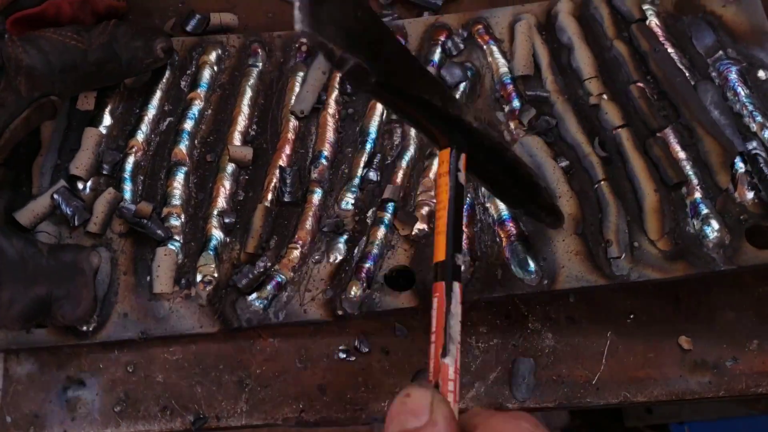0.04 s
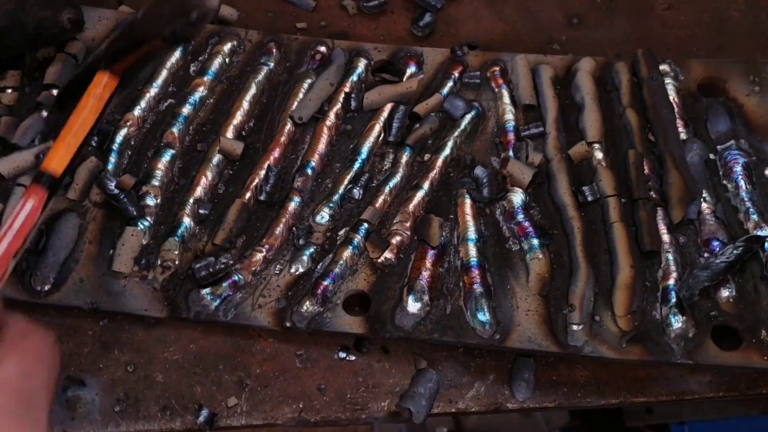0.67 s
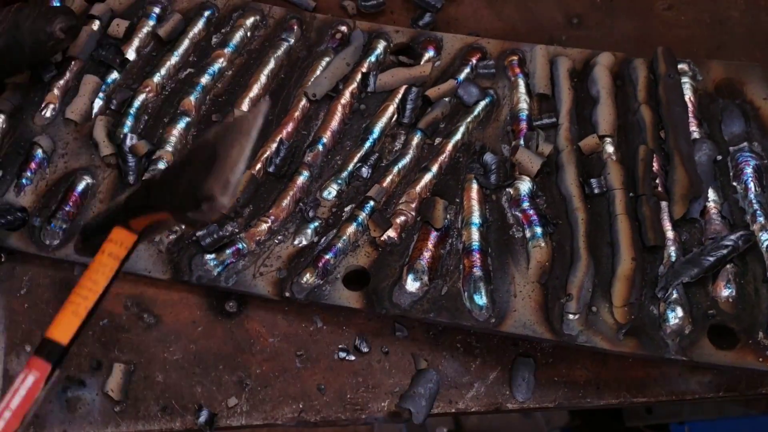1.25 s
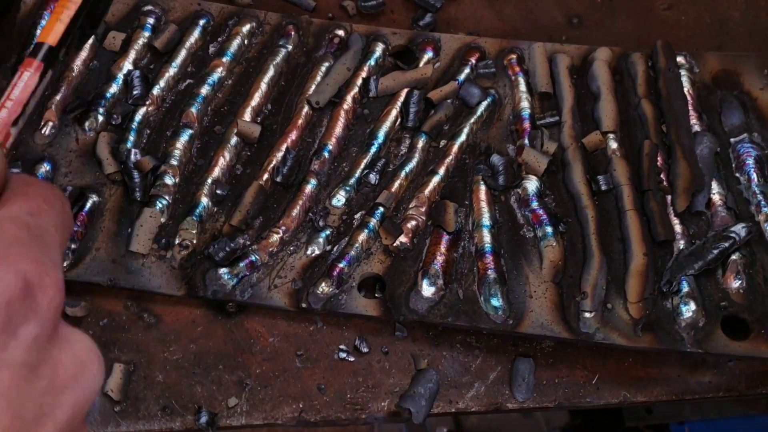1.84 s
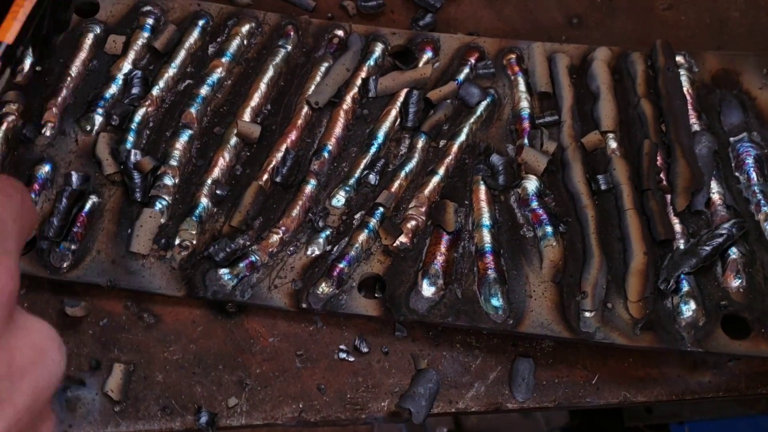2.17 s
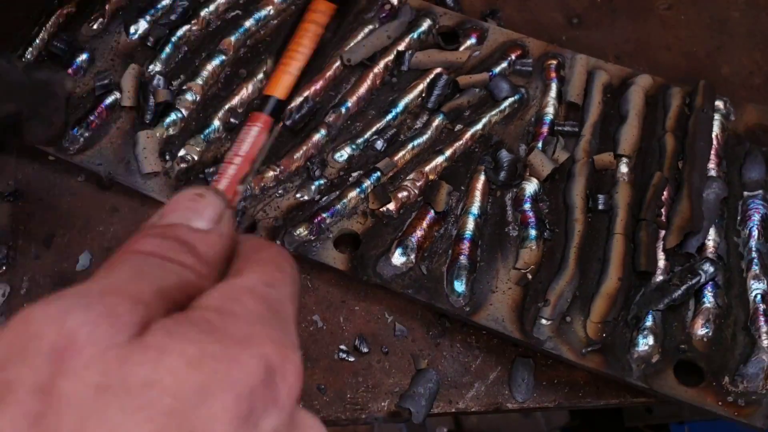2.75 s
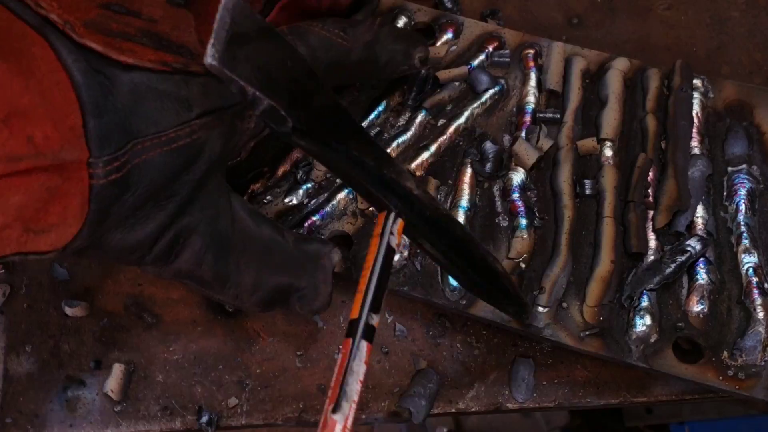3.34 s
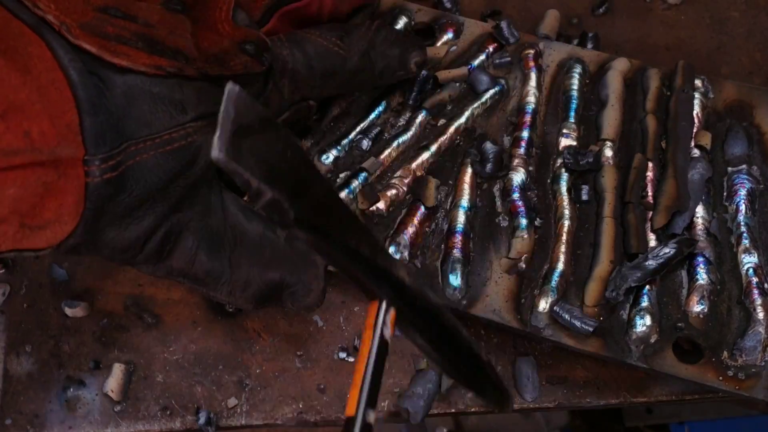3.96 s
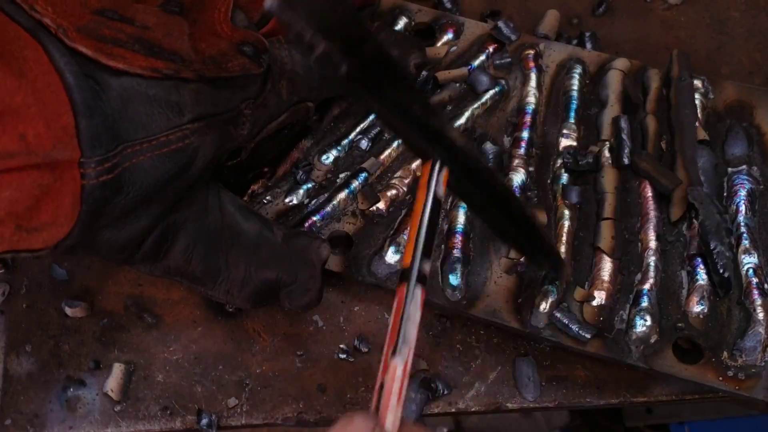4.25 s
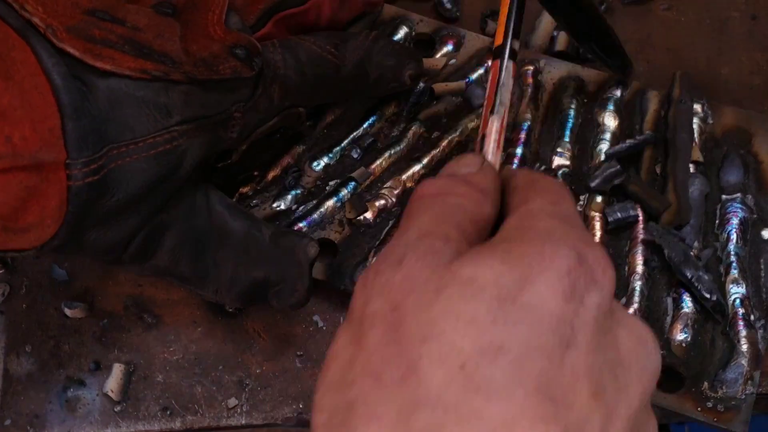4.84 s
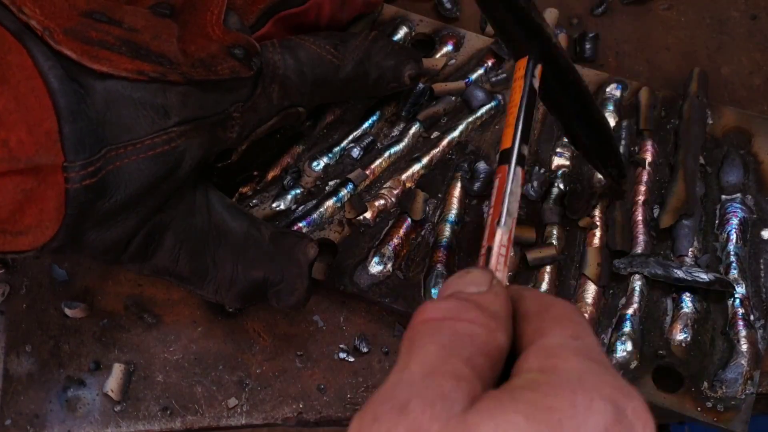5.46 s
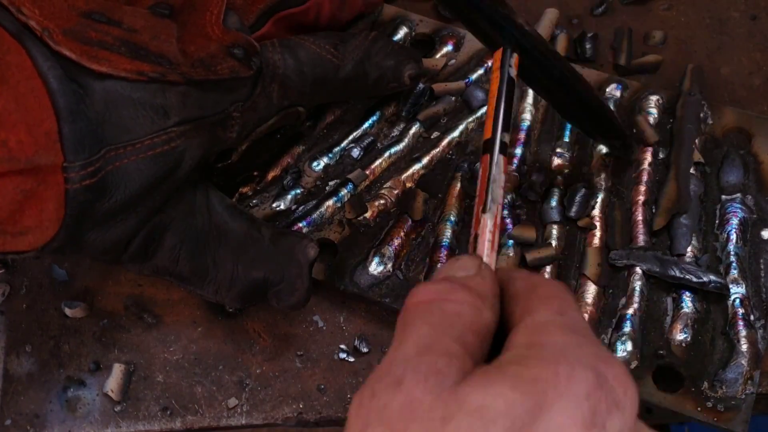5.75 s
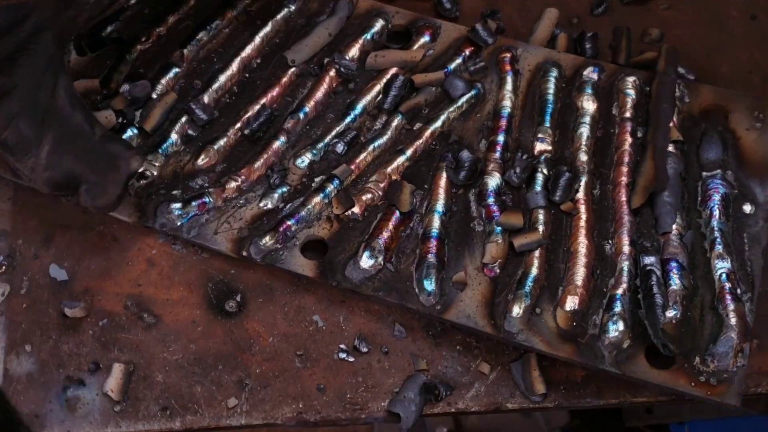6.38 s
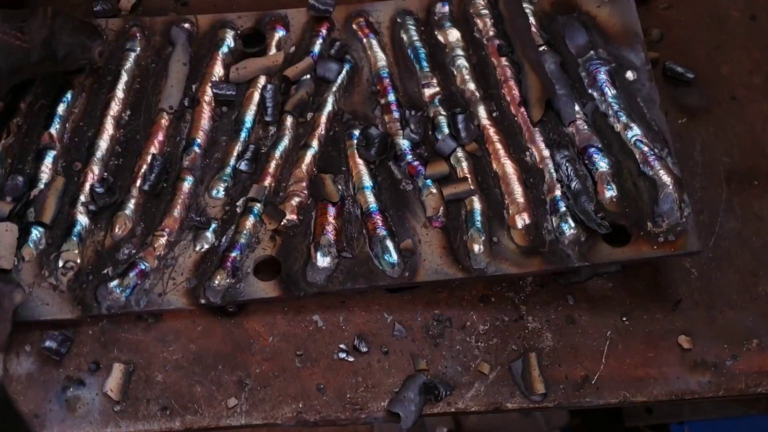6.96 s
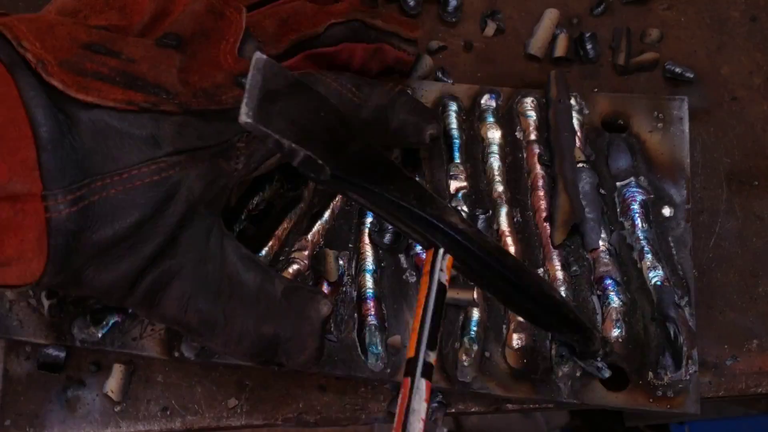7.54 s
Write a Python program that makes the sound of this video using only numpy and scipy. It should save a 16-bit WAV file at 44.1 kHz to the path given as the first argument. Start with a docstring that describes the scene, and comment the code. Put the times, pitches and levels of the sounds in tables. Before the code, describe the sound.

Close up in a quiet workshop, a steel tool taps and scratches at crusted welds on a loose metal plate. Each hit rings briefly and scatters small ticking chips. The plate is then held down for a run of quick, rasping strokes and bright clinks, before it shifts across the bench with a scrape and a few dull thumps. A last few knocks follow, with the bench rumbling softly underneath.

```python
"""In a workshop, close by, a steel hand tool knocks and scrubs slag (crust) off the welds of a steel plate.
In each stroke the edge sticks and slips, and this rush of tiny hits makes plate and tool ring.
Knocks chatter for a few milliseconds and throw flakes of slag, which tick as they land.
The plate lies loose at first, then a gloved hand holds it down for the fastest scrubbing,
then it slides and judders. The bench rumbles underneath."""
import sys
import numpy as np
from scipy import signal
from scipy.fft import rfft, irfft, next_fast_len
from scipy.io import wavfile
from scipy.ndimage import uniform_filter1d

SR = 44100
rng = np.random.default_rng(int(sys.argv[2]) if len(sys.argv) > 2 else 0)


def wav_record(signal):
    """Record a signal, one row per channel, as 16-bit PCM in the file named by sys.argv[1]."""
    frames = np.transpose(np.atleast_2d(signal))
    bounded = np.clip(frames, -1, 1)
    # unit amplitude maps onto the largest positive 16-bit level
    quanta = np.round(bounded * 32767).astype(np.int16)
    wavfile.write(sys.argv[1], SR, quanta)


N = 340011
TIME = np.arange(N) / SR
LOOSE, HELD, SLIDING = 0, 1, 2  # the three grips on the plate
HELD_FROM_S, HELD_TO_S, SLID_TO_S = 3.3, 6.2, 7.5
MEDIUM_SCRAPE_DB = -35.5

# The faint hiss of the still room: pitch_hz, level_db
AIR_COLOUR = [(20, 2.5), (120, -25), (300, -6.5), (1500, 17), (4000, 6), (15000, -17)]
# The low boom of the bench top: pitch_hz, level_db
BENCH_COLOUR = [(20, -39.5), (45, -19.5), (70, -14), (92, -6.5), (112, -0.5), (135, 2), (160, -8.5),
                (200, -15), (280, -18), (600, -70)]
# The plate rocks and thumps the bench: peak_s, level_db
BENCH_THUMPS = [(0.35, -32.5), (0.55, -33.5), (0.61, -34.5), (0.67, -32), (0.968, -29.5), (1.102, -35),
                (2.09, -39), (3.86, -35), (4.016, -34.5), (4.68, -36), (5.71, -35), (5.99, -40),
                (6.29, -39.5), (6.48, -51), (6.72, -37.5), (6.85, -26.5), (6.928, -20.5), (6.98, -28.5),
                (7.139, -40.5), (7.285, -41), (7.46, -27.5), (7.57, -41)]
# What each grip does, one row each for loose, held and sliding ("body" means the low tones):
# scrape_body_db, knock_body_db, rumble_at_medium_scrape_db, rumble_db_per_scrape_db, boom_pitch_ratio
GRIP_EFFECTS = [(6, 6, -42, 0.55, 1.05), (1.5, -0.5, -47.5, 0.44, 0.95), (5.5, 5, -41, 0.72, 1.007)]
# The broad tone of steel touching steel: pitch_hz, loose_db, held_db, sliding_db
CONTACT_COLOUR = [(40, -5, -11, -44), (130, 1, -5, 1.5), (261, -5.5, -3.5, -2), (424, 1.5, -1, -4.5),
                  (810, 0.7, 0.5, -7), (940, -0.5, -3, -6), (2360, -2.5, -6, -9), (3720, 2, -2.5, -2),
                  (4850, -8, -20.5, -14), (5980, -15, -27, -20.5), (9800, -24.5, -35, -26),
                  (13500, -28.5, -45.5, -33.5), (14900, -32, -49, -39)]
# Modes (pitches a thing likes to ring at) of plate and tool:
# pitch_hz, width_hz, loose_lift_db, held_lift_db, sliding_lift_db
STEEL_MODES = [(530, 430, 2.5, 0.13, 7), (691, 140, -2, 3.6, -5.5), (820, 70, 2, 5.1, 1.5),
               (1543, 370, 12.5, 10.1, 8), (1726, 400, 5, 4.4, 9.5), (2102, 186, 13, 4, 8),
               (2520, 344, 11, 0.55, 7.5), (2792, 380, 4.5, 2.3, 4.5), (3360, 510, 9, 3.1, 6),
               (5100, 280, 5, 10.4, 3.5), (5850, 440, 5, 1.6, 5.5), (7100, 390, 1, 6.4, 0),
               (7370, 60, -5, 3.8, 4), (8700, 620, 0.5, 2.2, -0.5), (9800, 870, 8, 6.9, 3),
               (10800, 170.0, 9, 2.9, 6), (12300, 380, -6, 10, -1)]
# The plate's high modes: pitch_hz, level_db
PLATE_MODES = [(3930, -67), (4075, -86), (4264, -66), (5087, -69), (5690, -68), (6368, -83), (6659, -70),
               (7499, -72), (7763, -79), (8457, -74), (9502, -75.5), (11278, -79.5), (11606, -76.5),
               (13577, -82)]
# Modes of the tool's head (t60 is the time to fade by 60 dB): pitch_hz, not_held_db, held_db, t60_s
TOOL_MODES = [(1520, -33, -39, 0.15), (2126, -60, -45, 0.045), (3050, -48, -32, 0.24),
              (5096, -45, -26.5, 0.057), (7240, -41, -20, 0.025)]
# The surfaces stay in light touch between strokes: start_s, end_s, level_db, bright_db
LIGHT_RUBS = [(0, 0.1, -38.5, 0), (0.136, 0.471, -47.5, 7.5), (0.552, 0.995, -45, 0), (1.436, 1.52, -51, 4),
              (2.499, 2.722, -44, 3), (2.923, 3.146, -50.5, 8.5), (3.433, 4.016, -39.5, 3),
              (4.17, 4.887, -47.5, 3), (5.047, 5.384, -53, 5), (5.501, 6.206, -48, 10),
              (6.272, 6.52, -51, 0), (6.55, 7.073, -53, 5.5), (7.12, 7.168, -57.5, -15),
              (7.572, 7.69, -46.5, 12)]
# Scraping strokes, about thirteen a second at the fastest: peak_s, length_s, level_db, bright_db
SCRAPE_STROKES = [(0.059, 0.02, -27.5, -6), (0.152, 0.012, -33, 1), (0.22, 0.03, -44.5, 7),
                  (0.283, 0.02, -40.5, 6), (0.602, 0.059, -41, -9), (0.731, 0.035, -33, 3),
                  (0.815, 0.02, -31, 2.5), (0.883, 0.027, -29.5, 3.5), (0.971, 0.058, -36.5, 4.5),
                  (1.152, 0.046, -36.5, 2), (1.4, 0.035, -32.5, -5), (1.633, 0.045, -41, 0.5),
                  (1.956, 0.022, -42, -2), (2.12, 0.027, -37, 0), (2.398, 0.014, -31, -4),
                  (2.61, 0.011, -45, 3), (2.665, 0.032, -36, 6.5), (3.24, .014, -51, 10),
                  (3.577, 0.02, -24.5, .5), (3.666, 0.037, -26, -2), (3.75, 0.039, -21, -2.5),
                  (3.859, 0.048, -24, -2), (3.955, 0.053, -21.5, -4), (4.205, 0.031, -35.5, 9.5),
                  (4.298, 0.022, -33, -4), (4.365, 0.032, -34.5, 2), (4.446, 0.013, -37.5, 3),
                  (4.507, 0.019, -32, 2), (4.592, 0.027, -31.5, 3), (4.675, 0.039, -28.5, 3),
                  (4.739, 0.028, -31, 2.5), (4.808, 0.031, -30.5, 1), (4.845, .017, -28, 1),
                  (4.876, 0.014, -31, 4), (5.243, 0.041, -38, 5.5), (5.316, 0.03, -30.5, 6),
                  (5.552, 0.036, -28.5, -1), (5.616, 0.041, -28.5, .5), (5.675, 0.029, -32, -12),
                  (5.759, 0.024, -29.5, -10), (5.83, 0.03, -28.5, -4), (5.888, 0.023, -23, -3),
                  (6.046, 0.053, -27, 1), (6.234, 0.024, -36.5, 14), (6.292, 0.031, -43.5, 2),
                  (6.459, 0.068, -31, 1), (6.588, .022, -34.5, 10.5), (6.754, 0.015, -38.5, 10),
                  (6.851, 0.047, -26, 2.5), (6.91, 0.084, -29.5, -4), (7.277, 0.052, -39.5, 5.5),
                  (7.421, 0.065, -35, 4), (7.451, 0.033, -21, -3), (7.629, 0.026, -30, 1),
                  (7.715, 0.014, -36, 6)]
# The tool lands or catches on a weld, then drags on:
# start_s, chatter_s, level_db, bright_db, clink_hz, clink_lift_db, drag_db
TOOL_KNOCKS = [(0.111, 0.011, -36, 11, 1250, 11, -43.5), (0.309, 0.027, -28, 6.5, 2760, 3, -32),
               (0.383, 0.0078, -27, 6.5, 2000, 5, -68), (0.461, .01, -62, 7, 2000, 8, -54.5),
               (0.533, 0.016, -29, -2, 1950, 3.5, -46), (0.647, .012, -30, 8.5, 2500, 2, -45),
               (0.751, .011, -25, -2, 1300, 0.5, -37), (0.907, .0085, -24, 12.5, 3570, 8, -40),
               (1.092, 0.013, -22.5, -2, 2220, 6.5, -45), (1.176, .014, -20, 6, 4170, 8.5, -42.5),
               (1.317, 0.0069, -25.5, -10, 1820, 7, -55), (1.407, 0.0065, -17, 6, 4280, 7.5, -49),
               (1.558, 0.017, -42.5, -2, 3720, -2, -41.5), (1.7, 0.013, -46, 3, 2620, -5, -58),
               (1.737, 0.0059, -27, 3, 5100, 13, -32), (1.893, 0.0048, -24, -4, 1700, 13.5, -36),
               (2.056, 0.0089, -29.5, -3, 3480, 6.5, -40), (2.216, 0.011, -20.5, -6, 1890, 8.5, -33.5),
               (2.329, 0.0064, -53, 4, 3000, -6, -60), (2.362, 0.019, -27, -2.5, 2310, 6, -38),
               (2.469, 0.0044, -34, 3, 2020, 5, -49), (2.524, 0.0045, -32.5, -2, 2620, 23, -52),
               (2.837, 0.0051, -22.5, -3, 1770, 9, -38), (2.879, 0.0074, -24, -11, 1850, 9, -75),
               (3.056, 0.021, -38, 6, 3300, 4, -66), (3.315, 0.01, -31.5, 3.5, 2330, 7, -46.5),
               (3.412, 0.018, -40, 10, 1590, 11, -46), (3.496, 0.019, -22.5, 6, 3000, 0, -52),
               (3.565, 0.0027, -29, -9, 3780, 14, -45), (3.993, 0.018, -19, 4.5, 3250, 7.5, -58),
               (4.147, 0.0045, -18, -6, 1600, 5.5, -48), (4.516, 0.019, -26.5, -1, 1420, 6, -60),
               (4.887, 0.0076, -24.5, 4.5, 2000, 4, -61), (4.948, 0.0094, -20.5, -2.5, 5100, 9, -49),
               (4.989, .004, -37, 4, 1350, 8, -44), (5.034, 0.0021, -25, -10, 1730, 29, -26),
               (5.072, 0.012, -24, 0, 1840, 5, -57), (5.126, 0.012, -25.5, 1, 3900, 5, -31),
               (5.145, 0.0021, -16.5, 0, 4300, 7, -53), (5.327, 0.0012, -11.5, 1.5, 2800, 2.5, -41),
               (5.365, 0.011, -50, 22, 3100, 4, -80), (5.462, 0.0061, -33, 6.5, 3670, 4, -59),
               (5.695, 0.019, -22, -1, 3450, -0.5, -42), (5.742, 0.009, -21, -12, 1580, 1, -50),
               (5.869, 0.007, -23, -17, 1875, -2, -51), (5.94, 0.02, -24.5, -3, 1400, 1.5, -33.5),
               (6.719, .0077, -37, 6, 1190, 11, -48), (6.913, 0.015, -23.5, 2, 3460, 4, -35.5),
               (6.949, 0.015, -25.5, 0, 1980, 3, -44), (7.003, 0.0048, -24.5, 3, 2870, 3.5, -68),
               (7.052, 0.0036, -49, -3, 1600, 14, -71), (7.093, 0.0053, -38, 5, 1650, 1, -49),
               (7.35, 0.0068, -33.5, 0, 2400, 3, -39.5), (7.554, 0.0079, -18, -9, 1910, 3.5, -48),
               (7.661, 0.0034, -24.5, 1, 2140, 9, -55)]


def undb(db):
    """Turn decibels into a gain."""
    return 10 ** (np.asarray(db) / 20)


def rms(x):
    """The average strength of a sound (root mean square)."""
    return np.sqrt(np.mean(x ** 2))


def fade(t, t60_s):
    """A ring dying away, 60 dB down after t60_s."""
    return np.exp(-np.log(1000) * t / t60_s)


def along(hz, points_hz, points_db):
    """Join the points of a tone curve with straight lines over log frequency."""
    return np.interp(np.log(hz + 1), np.log(points_hz), points_db)


def noise(colour):
    """Noise of rms 1, shaped by rows of pitch_hz, level_db."""
    size = next_fast_len(N, real=True)
    gain = undb(along(np.fft.rfftfreq(size, 1 / SR), *np.transpose(colour)))
    x = irfft(rfft(rng.standard_normal(size)) * gain, size)[:N]
    return x / rms(x)


def steadied(x, span_s):
    """Even out swells longer than span_s, keeping the fine texture."""
    window = max(int(span_s * SR), 2)
    power = uniform_filter1d(uniform_filter1d(x ** 2, window), window)
    return x / np.sqrt(np.abs(power) + 1e-18)


def add(track, start_s, sound, loudness):
    """Mix a sound into the track at the given rms."""
    start = int(start_s * SR)
    first, last = max(start, 0), min(start + len(sound), N)
    track[first:last] += sound[first - start:last - start] * loudness / rms(sound)


def grip_at(s):
    """Whether the plate is LOOSE, HELD or SLIDING at this time."""
    return HELD * ((s > HELD_FROM_S) & (s <= HELD_TO_S)) + SLIDING * ((s > HELD_TO_S) & (s < SLID_TO_S))


def air(level_db=-74):
    """The still workshop hisses faintly."""
    return undb(level_db) * noise(AIR_COLOUR)


def room_echoes(x, wet_db=-11, t60_s=0.15, gap_s=0.0027):
    """Add quick, dense echoes from the bench and the things around it."""
    t = np.arange(SR // 2) / SR
    tail = rng.standard_normal(len(t)) * fade(t, t60_s) * (t > gap_s)
    wet = signal.fftconvolve(x, tail / np.sqrt(np.sum(tail ** 2)))[:N]
    return (x + undb(wet_db) * wet) / np.sqrt(1 + undb(wet_db) ** 2)


def bench_rumble(push, settle_s=0.01, thump_rise_s=0.012, thump_fall_s=0.024):
    """The bench top booms, louder the harder the plate is worked, and whenever the plate rocks."""
    keep = np.exp(-1 / (settle_s * SR))
    load = signal.lfilter([1 - keep], [1, -keep], (push / undb(MEDIUM_SCRAPE_DB)) ** 2 + 1e-12)
    grip = grip_at(TIME)
    _, _, rumble_db, growth, _ = np.array(GRIP_EFFECTS)[grip].T
    power = undb(rumble_db) ** 2 * load ** growth
    for peak_s, level_db in BENCH_THUMPS:
        t = TIME - peak_s
        width_s = np.where(t < 0, thump_rise_s, thump_fall_s)
        power += undb(level_db) ** 2 * np.exp(-(t / width_s) ** 2)
    # the weight of the pressing hand lowers the boom's pitch
    booms = [noise([(hz * ratio, db) for hz, db in BENCH_COLOUR]) for *_, ratio in GRIP_EFFECTS]
    return steadied(np.choose(grip, booms), span_s=0.038) * np.sqrt(power)


def plate_shimmer(x, ring_db=-9, t60_s=0.064, glove_db=-10):
    """The plate's high modes ring on faintly after each touch, less so under the glove."""
    t = np.arange(SR // 3) / SR
    mode_hz, mode_db = np.transpose(PLATE_MODES)
    # the touch already carries the broad tone, so take that out of each mode's level
    gains = undb(mode_db - along(mode_hz, *np.transpose(CONTACT_COLOUR)[:2]))
    tail = gains @ np.cos(2 * np.pi * mode_hz[:, None] * t) * fade(t, t60_s)
    held = grip_at(TIME) == HELD
    drive = x * undb(ring_db + glove_db * held)
    return signal.fftconvolve(drive, tail / np.sqrt(np.sum(tail ** 2)))[:N]


def tool_ring(x):
    """Every touch shakes the tool's head, heard as a faint ring once it lifts off."""
    t = np.arange(SR // 2) / SR
    tails = np.zeros((2, len(t)))
    for hz, not_held_db, held_db, t60_s in TOOL_MODES:
        mode = np.cos(2 * np.pi * hz * t) * fade(t, t60_s)
        tails += np.outer(undb([not_held_db, held_db]), mode / np.sqrt(np.sum(mode ** 2)))
    held = grip_at(TIME) == HELD
    return (signal.fftconvolve(x * ~held, tails[0]) + signal.fftconvolve(x * held, tails[1]))[:N]


def steel_tone(s, body_db, bright_db, hz, place_db=2, ripple_db=2.48, ripple_hz=70, drift=0.012):
    """The tone curve in dB of one touch at time s; each spot on the plate favours different modes."""
    grip = grip_at(s)
    contact = np.transpose(CONTACT_COLOUR)
    db = along(hz, contact[0], contact[1 + grip])
    for pitch_hz, width_hz, *lift_db in STEEL_MODES:
        centre_hz = pitch_hz * (1 + drift * rng.standard_normal())
        peak_db = lift_db[grip] + place_db * (2 * rng.random() - 1)
        detune = (hz - centre_hz) / (width_hz / 2)
        db += peak_db / (1 + detune ** 2)
    # a crowd of weak modes lies between the strong ones
    crowd_hz = np.arange(0, SR / 2, ripple_hz)
    db += ripple_db * np.interp(hz, crowd_hz, rng.standard_normal(len(crowd_hz)))
    # pressure brings out the body, a sharp edge the treble
    return db + along(hz, [1110, 1420, 4100, 6160], [body_db, 0, 0, bright_db])


def causal(db):
    """A filter with this tone curve that rings only after the push (minimum phase)."""
    cepstrum = irfft(np.log(undb(db)))
    half = len(cepstrum) // 2
    cepstrum[1:half] *= 2
    cepstrum[half + 1:] = 0
    return np.exp(rfft(cepstrum))


def steel_sound(force, tone_db, spread_s=0.0013, spread_hz=2500):
    """A force rings the steel; bending waves smear each hit, the low tones arriving last."""
    hz = np.fft.rfftfreq(len(force), 1 / SR)
    delay_s = spread_s / np.sqrt(1 + hz / spread_hz)
    smear = np.exp(-2j * np.pi * np.cumsum(delay_s) * hz[1])
    return irfft(rfft(force) * causal(tone_db) * smear)


def falling_flakes(size=2048, count=4, softest_db=-49.5, range_db=6, flight_s=0.066, tinkle_db=18,
                   tinkle_width_hz=400, low_hz=2500, high_hz=11000):
    """Each knock throws a few flakes of slag, which tick on the plate as they land."""
    track = np.zeros(N)
    hz = np.fft.rfftfreq(size, 1 / SR)
    for start_s, _, knock_db, *_ in TOOL_KNOCKS:
        for when, pitch, strength in rng.random((count, 3)):
            landing_s = min(start_s + flight_s * when, TIME[-1])
            tinkle_hz = low_hz * (high_hz / low_hz) ** pitch
            detune = (hz - tinkle_hz) / (tinkle_width_hz / 2)
            tone_db = steel_tone(landing_s, body_db=-8, bright_db=6, hz=hz)
            tick = steel_sound(signal.unit_impulse(size), tone_db + tinkle_db / (1 + detune ** 2))
            add(track, landing_s, tick, undb(knock_db + softest_db + range_db * strength))
    return track


def snapping_chips(size, chips_per_s=170, t60_s=0.025, range_db=10, low_hz=4200, high_hz=15000):
    """Glassy chips of slag snap off, each with a brief pitch of its own; rms 1."""
    track = np.zeros(2 * size)
    t = np.arange(min(int(2 * t60_s * SR), size)) / SR
    decay = fade(t, t60_s)
    for when, pitch, strength in rng.random((int(chips_per_s * size / SR), 3)):
        hz = low_hz + pitch * (high_hz - low_hz)
        start = int(when * size)
        track[start:start + len(t)] += undb(range_db * strength) * decay * np.sin(2 * np.pi * hz * t)
    return track[:size] / rms(track[:size])


def friction(size, slips_per_s, scatter_db, grind_db):
    """The force at the edge: sharp, uneven slips over the fine grinding of slag dust."""
    slipping = rng.random(size) < slips_per_s / SR
    strength = undb(scatter_db * np.clip(rng.standard_normal(size), -2, 2))
    slips = slipping * strength * rng.choice([-1, 1], size)
    return slips / (rms(slips) + 1e-9) + undb(grind_db) * rng.standard_normal(size)


def scrape(pressure, s, level_db, bright_db, chips_db=-6, bump_db=3.5, bump_s=0.0082,
           body_per_db=-0.1444):
    """The edge slips along under the given pressure, bumping over the weld's ripples."""
    size = len(pressure)
    ripples = np.interp(np.arange(size) / SR / bump_s, np.arange(size), rng.standard_normal(size))
    slips = friction(size, slips_per_s=850, scatter_db=3.5, grind_db=-1.5)
    grit = slips + undb(chips_db) * snapping_chips(size)
    force = pressure * steadied(grit * undb(bump_db * ripples), span_s=0.086)
    # the harder the contact, the more the steel's ring outweighs its body
    body_db = GRIP_EFFECTS[grip_at(s)][0] + body_per_db * (level_db - MEDIUM_SCRAPE_DB)
    return steel_sound(force, steel_tone(s, body_db, bright_db, np.fft.rfftfreq(size, 1 / SR)))


def rubbing(size=36864, ease_s=0.0099, waver_db=3.1, waver_s=0.0305):
    """Light, wavering contact carries on from one stroke to the next."""
    track = np.zeros(N)
    t = np.arange(size) / SR
    for start_s, end_s, level_db, bright_db in LIGHT_RUBS:
        waver = np.interp(t / waver_s, np.arange(size), rng.standard_normal(size))
        touching = np.clip(np.minimum(t, end_s - start_s - t) / ease_s, 0, 1)
        pressure = touching * undb(waver_db * waver)
        rub = scrape(pressure, start_s, level_db, bright_db)
        add(track, start_s, rub, undb(level_db) * rms(pressure))
    return track


def swell(t, length_s, rise_share=0.59):
    """Pressure builds to a peak at t = 0, then drops a little faster as the edge leaves."""
    width_s = length_s * np.where(t < 0, rise_share, 1 - rise_share)
    return np.exp(-0.5 * (t / width_s) ** 2)


def strokes(size=12288, drag_lag_s=0.038, drag_s=0.041, drag_bright_share=0.4):
    """Each stroke, and the drag after each knock, is a scrape that swells and dies away."""
    track = np.zeros(N)
    t = (np.arange(size) - size // 2) / SR
    touches = [(peak_s, swell(t, length_s), level_db, bright_db)
               for peak_s, length_s, level_db, bright_db in SCRAPE_STROKES]
    drag = swell(t, drag_s) * (t > -drag_lag_s)  # it cannot start before the edge has landed
    touches += [(start_s + drag_lag_s, drag, drag_db, drag_bright_share * bright_db)
                for start_s, _, _, bright_db, _, _, drag_db in TOOL_KNOCKS]
    for peak_s, pressure, level_db, bright_db in touches:
        stroke = scrape(pressure, peak_s, level_db, bright_db)
        add(track, peak_s + t[0], stroke, undb(level_db) * rms(pressure))
    return track


def knocks(size=8192, gain_db=-0.08, first_touch=2.9, bite_s=0.0008, strike_db=2, strike_s=0.0036,
           chips_db=-9, clink_width_hz=900, usual_s=0.018, usual_db=-26, body_db_per_doubling=2.0,
           body_per_db=-0.03):
    """The edge lands and chatters on the weld; the stiffness of that contact gives the clink."""
    track = np.zeros(N)
    t = np.arange(size) / SR
    hz = np.fft.rfftfreq(size, 1 / SR)
    bass_cut_db = along(hz, [450, 800], [-4, 0])  # a light, quick blow hardly moves the heavy plate
    bite = 1 - np.exp(-t / bite_s)
    strike = (1 + undb(strike_db) * np.exp(-t / strike_s)) / (1 + undb(strike_db) / 4)  # hardest at first
    for start_s, chatter_s, level_db, bright_db, clink_hz, clink_lift_db, _ in TOOL_KNOCKS:
        pressure = bite * strike * np.exp(-0.5 * (t / chatter_s) ** 2)
        chatter = friction(size, slips_per_s=1800, scatter_db=-1.5, grind_db=-6)
        force = pressure * steadied(chatter + undb(chips_db) * snapping_chips(size), span_s=0.00077)
        force[0] += first_touch
        # a longer, gentler blow has more body
        body_db = GRIP_EFFECTS[grip_at(start_s)][1] + body_db_per_doubling * np.log2(chatter_s / usual_s)
        body_db += body_per_db * (level_db - usual_db)
        tone_db = steel_tone(start_s, body_db, bright_db, hz, place_db=-1, ripple_db=0) + bass_cut_db
        tone_db += clink_lift_db * np.exp(-(2 * (hz - clink_hz) / clink_width_hz) ** 2)
        add(track, start_s, steel_sound(force, tone_db), undb(level_db + gain_db) * rms(pressure))
    return track


def scene(knock_push_db=-7):
    """Strokes, rubbing and knocks in the room, over the bench's rumble and a faint hiss."""
    scraping = strokes() + rubbing()
    knocking = knocks()
    work = scraping + knocking + falling_flakes()
    ringing_work = work + plate_shimmer(work) + tool_ring(work)
    rumble = bench_rumble(scraping + undb(knock_push_db) * knocking)
    return (room_echoes(ringing_work) + rumble + air())[None]


def record(dry, ceiling=0.19, knee=5, top_hz=15600):
    """Round off the tallest peaks and cut the highest treble."""
    rounded = dry / (1 + np.abs(dry / ceiling) ** knee) ** (1 / knee)
    return signal.sosfilt(signal.ellip(10, 0.2, 80, top_hz, fs=SR, output="sos"), rounded)


dry = scene()
out = record(dry)
wav_record(out)
```